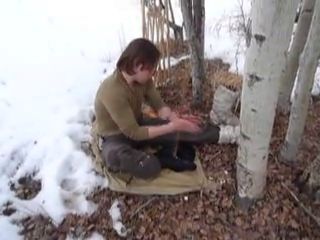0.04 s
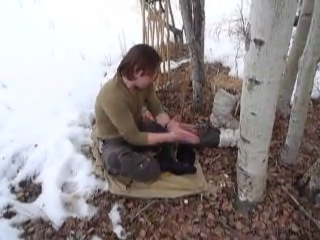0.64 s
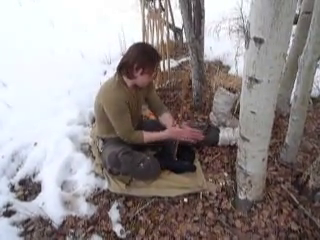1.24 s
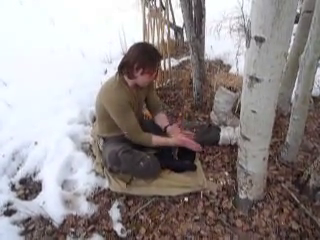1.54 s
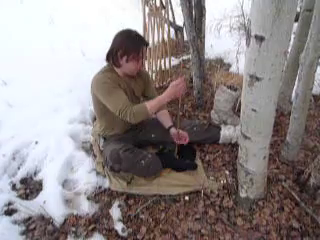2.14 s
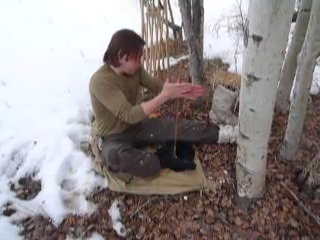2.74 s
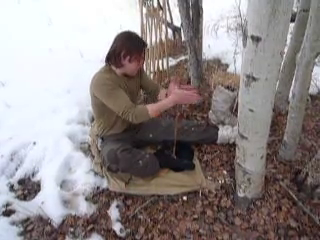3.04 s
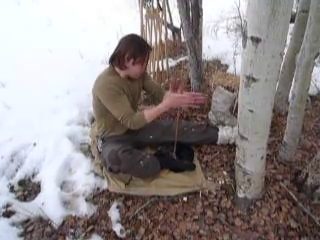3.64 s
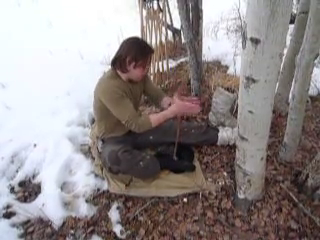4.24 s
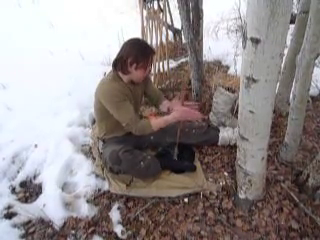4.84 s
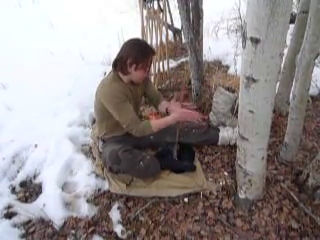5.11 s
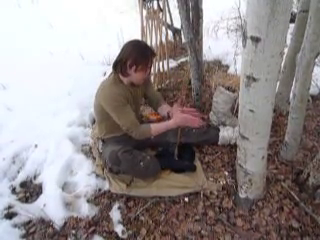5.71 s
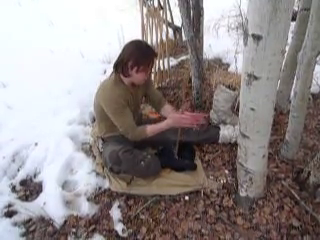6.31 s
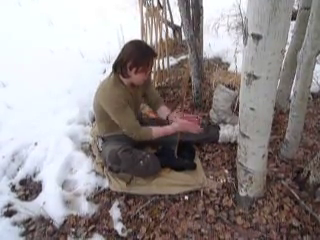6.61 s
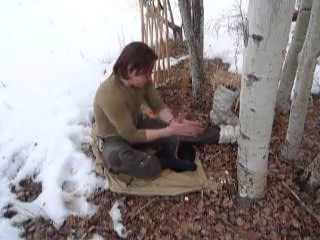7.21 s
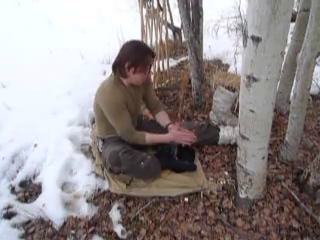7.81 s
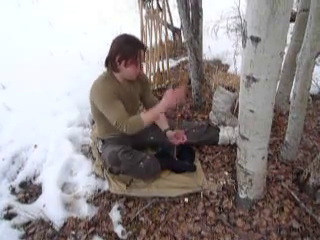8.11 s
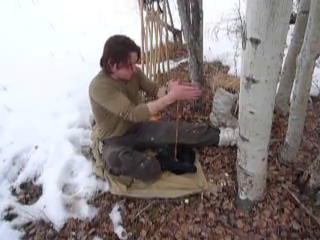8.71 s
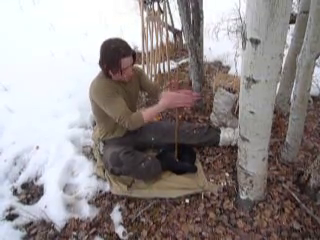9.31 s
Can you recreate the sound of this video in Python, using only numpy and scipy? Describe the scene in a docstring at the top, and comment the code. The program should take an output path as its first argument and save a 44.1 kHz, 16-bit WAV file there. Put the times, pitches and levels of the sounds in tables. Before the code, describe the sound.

A wooden spindle is rolled between the palms against a board, a few steps from the microphone in a quiet wood. It makes a fine, dry rasp at about nine strokes a second, with tiny squeaks. Twice the strokes pause and the wood knocks lightly before the rubbing starts again. A soft rush and a low drone lie far off, and a camera motor whines faintly at the microphone.

```python
"""A hand drill, a few steps from the microphone in a winter wood: a wooden spindle is rolled between
the palms, about nine strokes a second, in the notch of a fireboard. Each stroke grinds charred fibres
that ring the wood, and at full speed the tip sometimes catches and squeaks. Twice the strokes pause and
the hands climb back up the spindle with light knocks. Far off lie the soft rush of the woodland and a
low drone; right at the microphone, a camera motor whines faintly."""
import sys
import numpy as np
from scipy import signal
from scipy.fft import rfft, irfft
from scipy.io import wavfile
from scipy.ndimage import uniform_filter1d

SR = 44100
rng = np.random.default_rng(int(sys.argv[2]) if len(sys.argv) > 2 else 0)


def wrap_up_sound(samples):
    """Save the sound to the file named by the first command line argument, as 16-bit audio."""
    columns = np.atleast_2d(samples).T
    # keep every value between -1 and 1, then stretch to whole-number steps
    tamed = np.clip(columns, -1, 1)
    steps = np.round(tamed * 32767).astype(np.int16)
    wavfile.write(sys.argv[1], SR, steps)


N = 421155
T = np.arange(N) / SR


def undb(db):
    """Decibels to gain."""
    return 10 ** (np.asarray(db) / 20)


def unit(x):
    """Scale to rms 1."""
    return x / np.sqrt(np.mean(x ** 2))


def curve(points, at=T):
    """Straight lines through (time, value) points."""
    return np.interp(at, *np.transpose(points))


def wander(rate_hz):
    """Smooth random wander with a spread near 1."""
    hold = int(SR / rate_hz)
    steps = np.repeat(rng.standard_normal(N // hold + 1), hold)
    return 1.3 * uniform_filter1d(uniform_filter1d(steps, hold), hold)[:N]


def colour(x, spectrum):
    """Shape a sound by a short spectrum, falling away above its last point."""
    hz, db = np.transpose(spectrum)
    f = np.maximum(np.arange(N // 2 + 1) * SR / N, 1)
    gain = undb(np.interp(np.log(f), np.log(hz), db)) * np.minimum(hz[-1] / f, 1) ** 2
    return unit(irfft(rfft(x) * gain, N))


def ring(x, modes, tilt_db=0):
    """Resonances with steep skirts (a band-pass applied twice), each struck at unrelated moments."""
    out = 0
    for k, (hz, width, db) in enumerate(modes):
        band = np.concatenate(signal.iirpeak(hz, hz / (2 * width), fs=SR))
        gain = undb(db) * (hz / 3000) ** (tilt_db / 6)
        out = out + gain * signal.sosfilt([band, band], np.roll(x, k * N // len(modes)))
    return unit(out)


def fibres(per_s, scatter_db):
    """Fibres snapping free: random tiny clicks, a few much stronger than the rest."""
    chance = rng.random(N)
    i = np.flatnonzero(chance < per_s / SR)
    size = np.minimum(-np.log(chance[i] * SR / per_s + 1e-9), 3)
    clicks = np.zeros(N)
    clicks[i] = (-1.0) ** (i % 2) * undb(scatter_db * size)
    return unit(clicks)


def slip(rate_hz, depth_db):
    """The contact holds and gives by turns: a quick wander of gain, bounded by the grip."""
    return undb(depth_db * np.tanh(wander(rate_hz)))


# runs of strokes at an even tempo: (start [s], end [s], strokes [count])
STROKE_RUNS = [(-0.062, 1.717, 16), (1.802, 1.912, 1), (2.538, 2.902, 3), (2.897, 3.676, 7),
               (3.729, 4.799, 10), (4.819, 6.548, 16), (6.542, 7.227, 6), (7.227, 7.852, 6),
               (8.657, 8.757, 1), (8.824, 9.537, 6)]
def strokes():
    """The palms push (+1) and pull (-1) by turns: rows of (middle [s], length [s], direction)."""
    rows = []
    for start, end, count in STROKE_RUNS:
        length = (end - start) / round(count)
        rows += [(start + (k + .5) * length, length, (-1) ** k) for k in range(round(count))]
    return rows


# how hard the palms bear down, easing at the foot of each descent: (time [s], level [dB])
PALM_EFFORT = [(0, -46), (0.45, -45), (1.0, -45.3), (1.56, -47.7), (1.67, -54.8), (1.85, -59.5),
               (2.55, -46), (3.0, -41.2), (3.5, -41.7), (3.65, -47.5), (3.78, -42.7), (4.15, -44.2),
               (4.5, -42), (5.2, -44.3), (6.4, -43.3), (6.85, -46.7), (7.5, -44.9), (7.69, -46.8),
               (7.8, -57), (8.7, -47), (9.15, -38.8), (9.55, -39.5)]
# how the tip sits in the notch: (time [s], bite relative to the effort [dB], bite pitch [Hz])
TIP_SEAT = [(0.45, -8, 2500), (0.75, -14, 2000), (1.5, -9, 2050), (2.8, -6, 2200), (3.5, -2.5, 2400),
            (3.78, -13, 2400), (4.0, -6, 2120), (4.5, -10, 2280), (5.2, -7.5, 2430), (5.75, -13, 2290),
            (6.15, -11, 2020), (6.8, -5.5, 2600), (7.35, -18, 2250), (7.65, -8.5, 2100), (8.9, -6.5, 2200),
            (9.3, -12, 2270)]
def spindle(skew=1.015, push_db=0.3, push_bite_db=-2.0):
    """The spindle speeds up and stops in each stroke; a push presses harder and bites less than a pull."""
    speed, force, bite, bite_hz, direction = np.zeros((5, N))
    seat_s, seat_db, seat_hz = np.transpose(TIP_SEAT)
    for middle, length, push in strokes():
        force_scatter_db, bite_scatter_db, detune = rng.standard_normal(3) * (0.35, 0.8, 0.025)
        i = slice(*np.searchsorted(T, [middle - length / 2, middle + length / 2]))
        progress = np.clip((T[i] - middle) / length + .5, 0, 1)
        speed[i], direction[i] = np.abs(np.sin(np.pi * progress ** skew)), push
        force_db = curve(PALM_EFFORT, middle) + push * push_db + force_scatter_db
        bite_db = np.interp(middle, seat_s, seat_db) + push * push_bite_db + bite_scatter_db
        force[i], bite[i] = undb(force_db), undb(force_db + bite_db)
        bite_hz[i] = np.interp(middle, seat_s, seat_hz) * (1 + detune)
    return speed, force, bite, bite_hz, direction


# ring of the spindle on the board: (frequency [Hz], nominal width [Hz], gain [dB])
WOOD_MODES = [(1330, 300, -15.5), (1973, 200, -13), (2567, 294, -5.5), (2895, 175, 0.5), (3203, 160, -2.5),
              (3350, 178, 0.5), (3690, 174, -6.5), (4050, 200, -18)]
# the rasp brightens and dulls as the grip shifts: (time [s], tilt [dB per octave])
GRIP_TILT = [(0, -3.5), (.43, -4), (1.1, 1), (2.6, 2.5), (3.1, -1), (3.6, -3), (3.8, 4.5), (4.1, 1),
             (4.42, 2.5), (5.0, 1), (6.4, 1.5), (7.7, 5.5), (9.3, 0)]
def wood_rasp(direction, push_tilt_db=1.7, drift=.02):
    """Charred fibres ring the wood, brighter on a push; the pitch drifts as the palms move along."""
    tilt_db = curve(GRIP_TILT) + direction * push_tilt_db
    wood = ring(fibres(per_s=5500, scatter_db=2.5), WOOD_MODES, tilt_db)
    position = np.cumsum(1 + drift * wander(12))
    return np.interp(position % N, np.arange(N), wood)


def tip_chatter(hz, half_width_hz=106):
    """Tiny slips of the tip ring one resonance, whose pitch depends on how the tip sits in the notch."""
    lowpass = signal.butter(2, half_width_hz, fs=SR, output="sos")
    carrier = np.exp(2j * np.pi * np.cumsum(hz) / SR)  # shifts the low-pass up to the moving pitch
    slips = fibres(per_s=2000, scatter_db=4.0)
    return unit((carrier * signal.sosfilt(lowpass, slips / carrier)).real)


# broad scrape at the notch and the hands: (frequency [Hz], gain [dB])
SCRAPE_SPECTRUM = [(120, -10.5), (350, -3), (600, -0.5), (900, -5), (1330, -2), (1700, -7), (3000, -4.5),
                   (4000, -9.5), (4500, -12), (5100, -25), (8000, -40)]
def broad_scrape(force):
    """Fibres and palms scrape over a wide band, only a little louder under more force."""
    return colour(fibres(per_s=6000, scatter_db=3.2), SCRAPE_SPECTRUM) * force ** 0.31 * undb(-38.8)


# low body of the fireboard: (frequency [Hz], nominal width [Hz], gain [dB])
BOARD_MODES = [(355, 40, -2.5), (581, 50, 1.5), (1030, 120, -11)]
# how strongly the board is shaken at full speed: (time [s], level [dB])
BOARD_SHAKE = [(0, -62), (0.45, -56.5), (1.1, -54.5), (1.7, -62), (2.7, -66.5), (4.0, -59), (5.2, -64),
               (6.7, -56.5), (7.7, -62), (9.3, -58.5)]
def fireboard(speed):
    """Snapping fibres shake the body of the board, harder as the spindle turns faster."""
    return ring(fibres(per_s=2500, scatter_db=4.0), BOARD_MODES) * speed * undb(curve(BOARD_SHAKE))


def hand_drill(load_db=-44):
    """A few steps away, the tip rubs unevenly as it turns and bites hardest in mid-stroke."""
    speed, force, bite, bite_hz, direction = spindle()
    sticking = 0.85 + 0.55 * force / undb(load_db)  # more force holds the tip longer at each reversal
    sliding = np.tanh(1.04 * speed ** sticking)  # sets in as the tip breaks loose, then levels off
    rasp = wood_rasp(direction) * force * sliding
    chatter = tip_chatter(bite_hz) * bite * speed ** 4.5
    scrape = broad_scrape(force) * sliding
    board = fireboard(speed)
    return slip(240, depth_db=3.0) * (rasp + chatter) + slip(120, depth_db=2.0) * scrape + board


# woodland, far from the microphone: (frequency [Hz], gain [dB])
RUSH_SPECTRUM = [(25, -19), (65, -11.5), (105, -12), (200, -5), (290, -3.5), (370, 0.5), (470, -2),
                 (600, -.5), (900, -5), (1200, -10.5), (2200, -13), (3400, -16.5), (4300, -28.5)]
# its slow rise and fall: (time [s], level [dB])
RUSH_COURSE = [(0, -53), (1.0, -52.7), (2.5, -53.5), (4.0, -54.7), (6.3, -54), (6.8, -51.3), (7.4, -52.6),
               (9.55, -51.7)]
def woodland_rush(flutter_db=0.45):
    """The wood all around: a smooth, distant rush whose level wavers slightly."""
    rush = colour(rng.standard_normal(N), RUSH_SPECTRUM)
    return rush * undb(curve(RUSH_COURSE) + flutter_db * wander(6))


# low drone in the distance: (frequency [Hz], nominal width [Hz], gain [dB])
DRONE_BANDS = [(48, 9.3, -11), (89, 18, -4), (135.6, 29, 0), (166, 28.5, -0.5), (223, 22, 0),
               (263.4, 30, -2), (381.6, 63, -3)]
# its slow rise and fall: (time [s], level [dB])
DRONE_COURSE = [(0, -60.7), (1.7, -62), (4.2, -58.7), (7.2, -58.7), (8.6, -59.9), (9.55, -58.3)]
def distant_drone():
    """Narrow bands of low noise hum far off, under the rush."""
    return ring(rng.standard_normal(N), DRONE_BANDS) * undb(curve(DRONE_COURSE))


# camera motor, right at the microphone: (frequency [Hz], rms level [dB])
MOTOR_TONES = [(134.3, -67), (4388.8, -74), (6222, -91), (6666.7, -85.5)]
def camera_whine(waver_hz=2.0, hiss_db=-64):
    """Slightly unsteady motor tones over even microphone hiss."""
    tones = 0
    for hz, db in MOTOR_TONES:
        phase = 2 * np.pi * np.cumsum(hz + waver_hz * wander(25)) / SR
        tones = tones + undb(db) * np.sqrt(2) * np.sin(phase)
    return tones + undb(hiss_db) * rng.standard_normal(N)


def light_catches(share=0.22, low_hz=2800, high_hz=3450, over_effort_db=2.0, scatter_s=0.008):
    """Now and then the tip catches lightly near mid-stroke: rows of (time [s], pitch [Hz], level [dB])."""
    rows = []
    for middle, _, _ in strokes():
        luck, late, high = rng.random(3)
        if luck < share:
            time = middle + scatter_s * (2 * late - 1)
            hz = low_hz + high * (high_hz - low_hz)
            rows.append((time, hz, curve(PALM_EFFORT, middle) + over_effort_db))
    return rows


# the tip catches hard in the notch and sings: (time [s], pitch [Hz], level [dB])
HARD_CATCHES = [(0.761, 2950, -38.5), (1.322, 3250, -37.5), (2.731, 2260, -42), (2.83, 1890, -42),
                (2.943, 2300, -40.5), (3.064, 2300, -30.5), (3.294, 2390, -39), (3.51, 2730, -37),
                (3.797, 3380, -37), (3.989, 1980, -36.5), (4.537, 2930, -35.5), (9.017, 2330, -37.5),
                (9.126, 2800, -32.5), (9.223, 2220, -34.5), (9.353, 2860, -34.5), (9.469, 2240, -34)]
def tip_squeaks(rise_s=0.0063, fall_s=0.0058, waver=.03, glide_per_s=6.0):
    """Stick and slip lock onto one resonance for a few milliseconds, bending upward and breaking off."""
    out, drift = np.zeros(N), wander(600)
    for time, hz, db in HARD_CATCHES + light_catches():
        i = np.flatnonzero(np.abs(T - time) < .03)
        t = T[i] - time
        envelope = np.exp(-np.abs(t) / np.where(t < 0, rise_s, fall_s))
        pitch = hz * (1 + glide_per_s * t + waver * drift[i])
        out[i] += undb(db) * envelope * np.sin(2 * np.pi * np.cumsum(pitch) / SR)
    return out * slip(550, depth_db=4.5)


# knocks at the drill while the grip changes: (time [s], level [dB], pitch [Hz])
GRIP_KNOCKS = [(1.80, -44, 517), (1.885, -40, 560), (2.168, -52, 1600), (2.215, -48, 3300),
               (2.450, -40.5, 1930), (2.513, -53, 3400), (8.326, -55, 3300), (8.578, -50, 2000)]
def grip_knocks(decay_s=0.0025, contact_s=0.0026, scratch_db=-4):
    """Hands and spindle knock lightly: short dull rings of wood, each with a brief dry scratch."""
    out = np.zeros(N)
    scratch = undb(scratch_db) * ring(rng.standard_normal(N), [(2700, 1000, 0)])
    for time, db, hz in GRIP_KNOCKS:
        i = np.flatnonzero((T > time - contact_s) & (T < time + 10 * decay_s))
        t = T[i] - time
        envelope = np.minimum(1 + t / contact_s, np.exp(-t / decay_s))
        hardness = min(hz / 2000, 1)  # soft, low bumps hardly scratch
        out[i] += undb(db) * envelope * (np.sin(2 * np.pi * hz * t) + hardness * scratch[i])
    return out


# swells far off in the wood: (time [s], half length [s], frequency [Hz], nominal width [Hz], level [dB])
FAR_SWELLS = [(8.6, 0.75, 870, 300, -61), (9.0, 0.51, 394, 25, -60.5)]
def distant_swells():
    """Single bands of noise rise softly out of the rush and drone, then sink back."""
    out = 0
    for time, half_s, hz, width, db in FAR_SWELLS:
        envelope = undb(db) * np.exp(-((T - time) / half_s) ** 2)
        out = out + ring(rng.standard_normal(N), [(hz, width, 0)]) * envelope
    return out


def scene():
    """One microphone in the open air, the drill a few steps away and the woodland far behind it."""
    return (hand_drill() + woodland_rush() + distant_drone() + camera_whine()
            + tip_squeaks() + grip_knocks() + distant_swells())[None]


def record(dry, top_hz=8150, dc_offset=-.0049):
    """The camera keeps nothing of the top octave, and its converter sits slightly off zero."""
    lowpass = signal.firwin(101, top_hz, window=("kaiser", 7), fs=SR)
    return signal.fftconvolve(dry, lowpass[None], mode="same") + dc_offset


dry = scene()
out = record(dry)
wrap_up_sound(out)
```